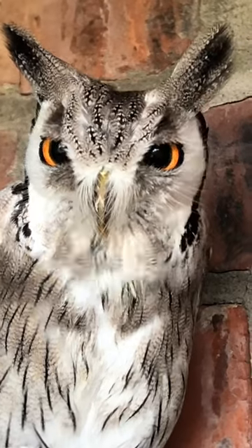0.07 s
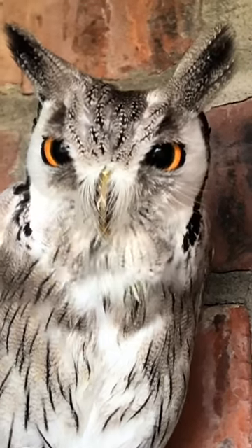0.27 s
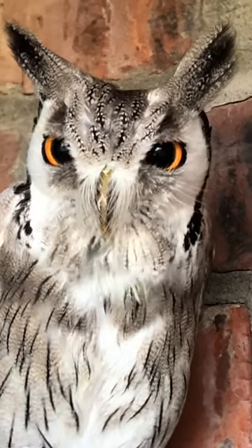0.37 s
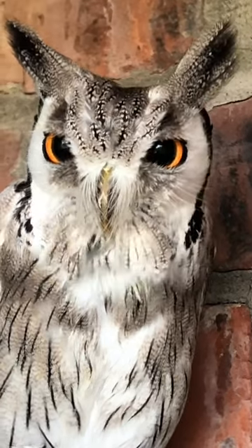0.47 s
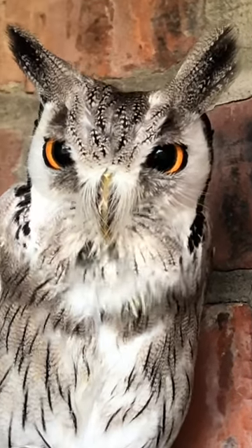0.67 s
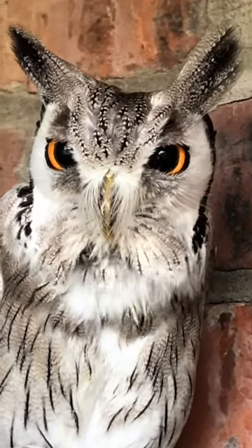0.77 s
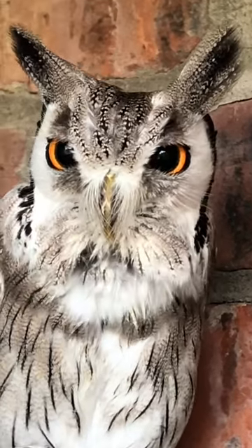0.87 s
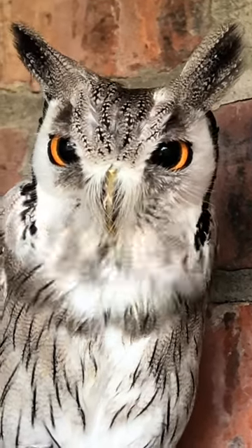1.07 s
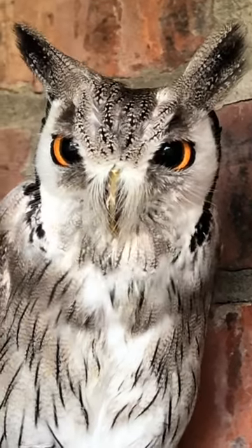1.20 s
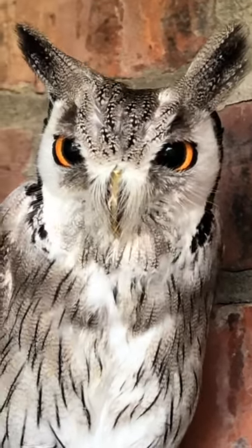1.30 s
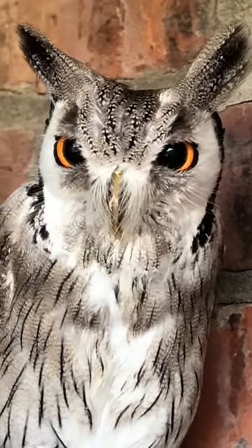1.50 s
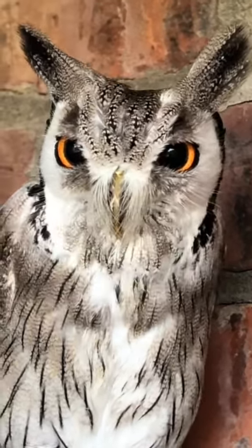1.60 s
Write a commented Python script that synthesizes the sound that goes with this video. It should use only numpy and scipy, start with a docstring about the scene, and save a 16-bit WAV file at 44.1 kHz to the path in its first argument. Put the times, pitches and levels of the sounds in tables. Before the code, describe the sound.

A small owl close to the microphone gives five quick, soft, low hoots, then a longer one that lifts, sinks and fades. A distant bird chirps faintly and something briefly rustles, over steady outdoor rumble and hiss.

```python
"""Small owl hooting close by

Five soft low hoots stutter into one long hoot that lifts, then sinks and fades. The voice is
almost a pure tone with a weak octave; higher overtones open only at full effort. A far bird
chirps three times and something rustles briefly, over a steady outdoor rumble and hiss."""
import sys
import numpy as np
from scipy import signal
from scipy.fft import rfft, irfft
from scipy.io import wavfile
from scipy.ndimage import uniform_filter1d

SR = 44100
rng = np.random.default_rng(int(sys.argv[2]) if len(sys.argv) > 2 else 0)


def bounce(signal):
    """Save signal as a 16-bit WAV file at the path given by the first command-line argument."""
    frames = np.transpose(np.atleast_2d(signal))
    limited = np.clip(frames, -1, 1)
    pcm = np.round(limited * 32767).astype(np.int16)
    wavfile.write(sys.argv[1], SR, pcm)


N = 72765
T = np.arange(N) / SR


def owl():
    """Five short arched hoots, then the long sinking one, husky as it gives out."""
    # Each row: middle in seconds, length in seconds, pitch in Hz, glide in Hz/s, level in dB.
    short_hoots = [(0.118, 0.061, 220.9, 92.5, -42.5), (0.243, 0.054, 232, -100, -43.5),
                   (0.353, 0.064, 224, -500, -43.5), (0.446, 0.059, 226.5, -750, -43.5),
                   (.534, 0.0612, 230.3, -1000, -43)]
    # Each row: time in seconds, pitch in Hz.
    long_pitch = [(.578, 245.7), (.595, 243), (.613, 235.5), (.642, 270.6), (.69, 271), (.77, 254.9),
                  (.85, 237.5), (.91, 220.9), (1.0, 193.8)]
    # Each row of both: time in seconds, level in dB.
    long_level = [(.577, -59), (.594, -43.5), (.617, -41.5), (.635, -38.5), (.68, -38), (.80, -42),
                  (.90, -44.5), (.965, -54), (1.01, -67)]
    husk_level = [(.77, -70), (.82, -66), (.873, -56.5), (.905, -64), (.97, -65.5), (1.03, -72)]
    arch_hz, swell_steepness = 13.8, 2.4
    hz, gain = curve(long_pitch), envelope(long_level)
    for middle_s, length_s, pitch_hz, glide_hz_per_s, db in short_hoots:
        position, shape = swell(middle_s, length_s)
        hoot_hz = pitch_hz + glide_hz_per_s * (T - middle_s) - arch_hz * position ** 2
        hz = np.where(abs(position) < 1, hoot_hz, hz)
        gain = gain + undb(db) * shape ** swell_steepness
    return owl_voice(hz, gain) + envelope(husk_level) * band(455, width_hz=300)


def owl_voice(hz, gain):
    """Slightly unsteady tone; overtones grow with effort, a little air passes once a cycle."""
    # Each row, from the octave up: level at full effort in dB, dB gained per dB of the fundamental.
    overtones = [(-51.8, .7), (-64, 3.2), (-66, 2.6), (-77, 2.5)]
    jitter, shimmer_db, waver_per_s = 0.005, 0.4, 140
    full_effort_db, air_db = -37.8, -37
    phase = 2 * np.pi * np.cumsum(hz * (1 + jitter * walk(waver_per_s))) / SR
    gain = gain * undb(shimmer_db * walk(waver_per_s))
    effort = gain / undb(full_effort_db)
    tone = gain * np.cos(phase)
    for harmonic, (db, growth) in enumerate(overtones, start=2):
        tone += undb(db) * effort ** growth * np.cos(harmonic * phase)
    air = undb(air_db) * gain * (1 + np.cos(phase)) * band(930, width_hz=450)
    return np.sqrt(2) * tone + air


def far_bird():
    """Three thin arched whistles with rasp; the last has two tones at once."""
    # Each row: start and length in seconds, pitch, rise and arch in Hz, rasp/tone ratio, level in dB.
    chirps = [(0.516, 0.088, 3720, -58.5, 59.7, 0.94, -76.5), (0.644, 0.046, 4950, 400, 240, .35, -71.5),
              (0.7, 0.058, 4088, 100.5, 178, 0.91, -68.5), (0.722, 0.052, 4720, 251.5, 80, 0.58, -79.5)]
    wobble_hz = 57
    out = np.zeros(N)
    for start_s, length_s, pitch_hz, rise_hz, arch_hz, rasp_ratio, db in chirps:
        position, shape = swell(start_s + length_s / 2, length_s)
        contour_hz = pitch_hz + rise_hz * position / 2 - arch_hz * position ** 2
        hz = contour_hz + wobble_hz * walk(per_s=900)
        whistle = np.sqrt(2) * np.sin(2 * np.pi * np.cumsum(hz) / SR)
        rasp = rasp_ratio * band(pitch_hz, width_hz=1800)
        out += undb(db) * shape * (whistle + rasp)
    return out


def rustle():
    """Faint, fine-grained brushing, perhaps feathers, as the long hoot sinks."""
    # Each row: time in seconds, level in dB.
    level = [(.73, -79), (.765, -73), (.795, -70.5), (.84, -71), (.90, -72), (.94, -78), (.98, -73),
             (1.04, -88)]
    # Each row: frequency in Hz, relative density in dB.
    spectrum = [(900, -15.5), (2200, -4.5), (3400, -4.5), (4500, -2), (5600, -5), (6600, -9.5), (8300, -12),
                (11000, -16), (15000, -18.5)]
    # Each row: middle and length in seconds, centre and width in Hz, level in dB.
    bright_strokes = [(0.804, 0.076, 6900, 1100, -74.5), (0.81, 0.055, 14500, 4000, -74.5),
                      (0.874, 0.14, 6405, 800, -74)]
    grain_db = 1
    brushing = envelope(level) * coloured(spectrum) + noise_swells(bright_strokes)
    return brushing * undb(grain_db * walk(per_s=180))


def background():
    """Low rumble like distant traffic, thin hiss, three soft swells."""
    # Each row of both: frequency in Hz, relative density in dB.
    rumble_spectrum = [(20, -43), (35, -19), (55, -8), (80, -6.5), (112, 1), (135, -3), (165, -7),
                       (215, -13), (275, -11.5), (350, -17), (500, -20.5), (620, -21), (760, -22),
                       (1000, -23), (1300, -30), (2000, -35.5), (4000, -51)]
    hiss_spectrum = [(500, -12.5), (1500, 2.5), (2800, -0.5), (4200, -1), (4750, -0.5), (5080, 1.5),
                     (5500, -3), (6600, -5), (8000, -10.5), (11000, -15.5), (15500, -19.5)]
    # Each row: middle and length in seconds, centre and width in Hz, level in dB.
    soft_swells = [(0.086, .34, 3170, 800, -78), (1.02, 0.37, 2810, 890, -77), (1.277, 0.12, 315, 200, -64)]
    rumble_db, rumble_waver_db = -55.5, 0.5
    hiss_db, hiss_waver_db = -74, 0.52
    rumble = undb(rumble_db + rumble_waver_db * walk(per_s=27)) * coloured(rumble_spectrum)
    hiss = undb(hiss_db + hiss_waver_db * walk(per_s=5.1)) * coloured(hiss_spectrum)
    return rumble + hiss + noise_swells(soft_swells)


def walls(x, wet_db, t60_s=0.53):
    """Adds a short diffuse echo from brickwork."""
    tail = rng.standard_normal(N) * np.exp(-np.log(1000) * T / t60_s)
    return x + undb(wet_db) * signal.fftconvolve(x, tail / np.linalg.norm(tail))[:N]


def undb(db):
    """Decibels to gain."""
    return 10 ** (np.asarray(db) / 20)


def curve(rows):
    """Straight lines through (s, value) rows."""
    return np.interp(T, *np.array(rows).T)


def envelope(rows):
    """Gain from (s, dB) rows, silent outside them."""
    return undb(curve(rows)) * (T > rows[0][0]) * (T < rows[-1][0])


def swell(middle_s, length_s):
    """Position within an event (-1 to 1) and a rounded rise and fall over it."""
    position = np.clip(2 * (T - middle_s) / length_s, -1, 1)
    return position, np.maximum(np.cos(position * np.pi / 2), 0)


def walk(per_s):
    """Smooth random wavering, standard deviation 1."""
    window = max(int(SR / per_s), 1)
    waver = uniform_filter1d(uniform_filter1d(rng.standard_normal(N), window), window)
    return waver / waver.std()


def shaped_noise(gain_at):
    """Unit-rms noise whose spectrum follows gain_at(Hz)."""
    hz = np.maximum(np.fft.rfftfreq(N, 1 / SR), 1)
    noise = irfft(rfft(rng.standard_normal(N)) * gain_at(hz), N)
    return noise / noise.std()


def coloured(spectrum):
    """Unit-rms noise shaped by (Hz, dB) rows."""
    hz, db = np.array(spectrum).T
    return shaped_noise(lambda f: undb(np.interp(np.log(f), np.log(hz), db)))


def band(centre_hz, width_hz):
    """Unit-rms noise in one steep-sided resonance."""
    return shaped_noise(lambda f: 1 / (1 + ((f - centre_hz ** 2 / f) / width_hz) ** 2))


def noise_swells(rows):
    """Noise bands that each rise and fall once."""
    out = np.zeros(N)
    for middle_s, length_s, centre_hz, width_hz, db in rows:
        _, shape = swell(middle_s, length_s)
        out += undb(db) * shape * band(centre_hz, width_hz)
    return out


def scene():
    """Mono mix: owl near and almost dry, bird far and wetter."""
    calls = walls(owl(), wet_db=-28.5) + walls(far_bird(), wet_db=-5.5)
    return (calls + rustle() + background())[None]


def record(dry):
    """Steep low-pass on the top treble."""
    cutoff_hz = 15750
    return signal.sosfilt(signal.ellip(12, 0.1, 80, cutoff_hz, fs=SR, output="sos"), dry)


dry = scene()
out = record(dry)
bounce(out)
```